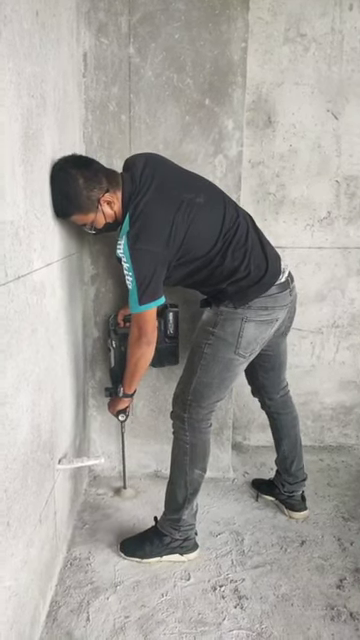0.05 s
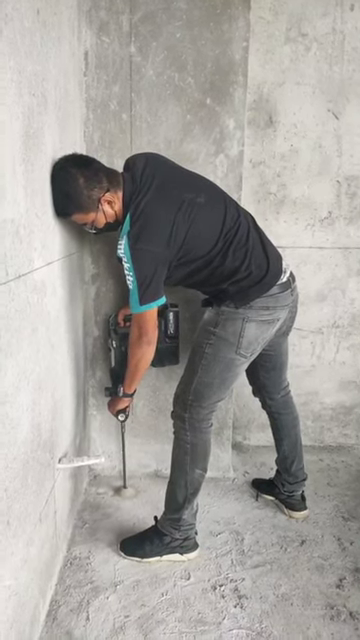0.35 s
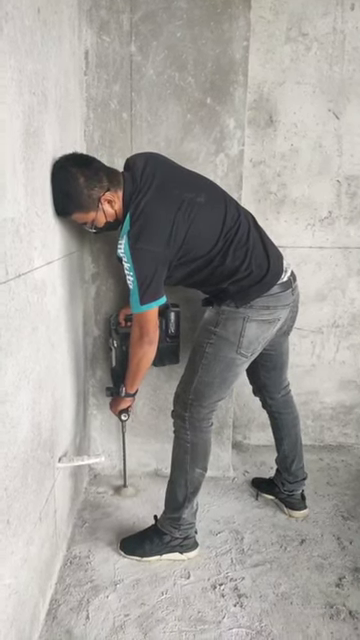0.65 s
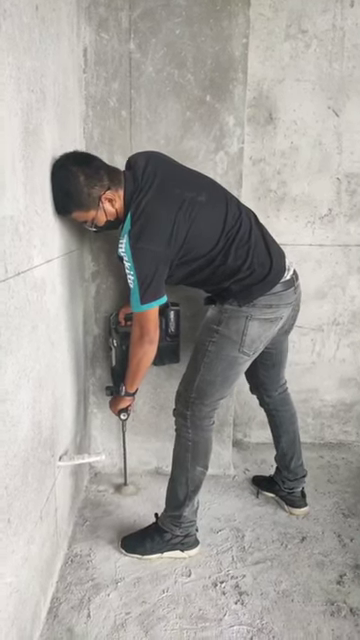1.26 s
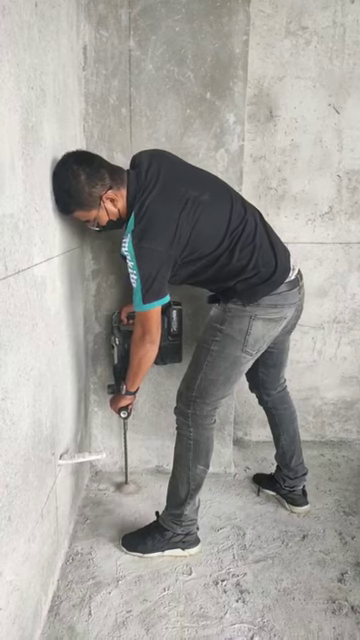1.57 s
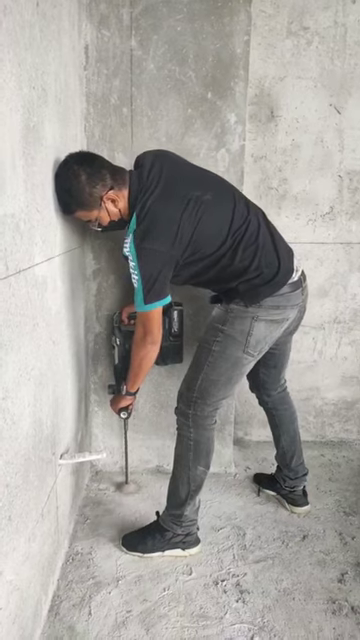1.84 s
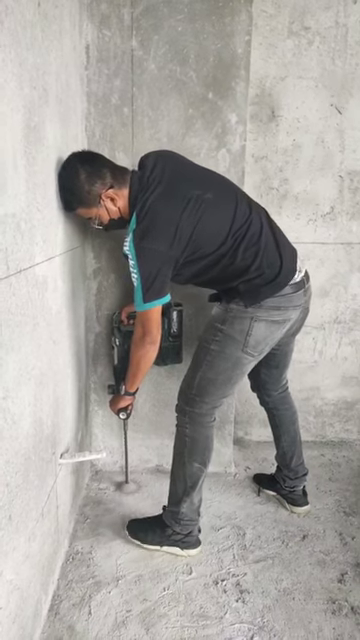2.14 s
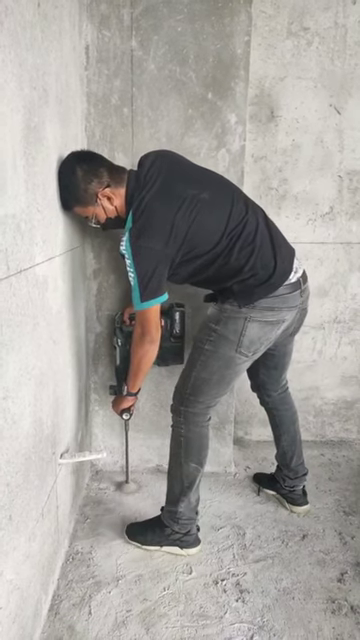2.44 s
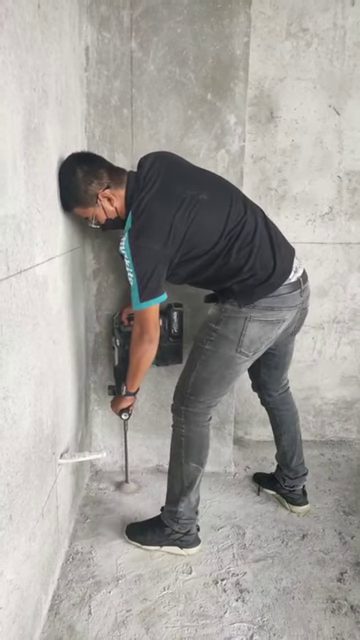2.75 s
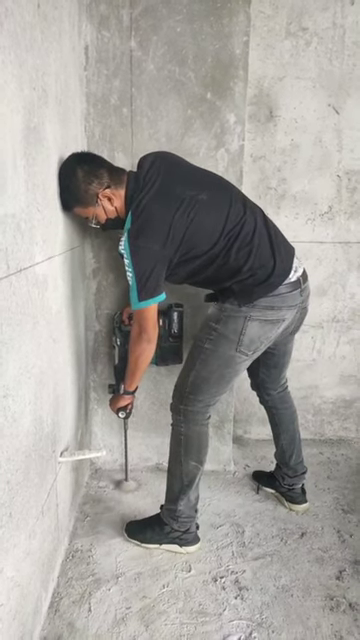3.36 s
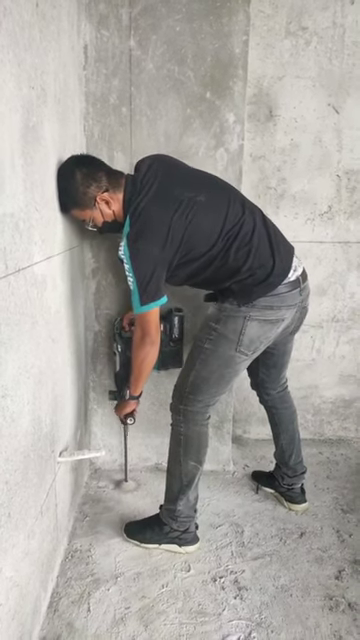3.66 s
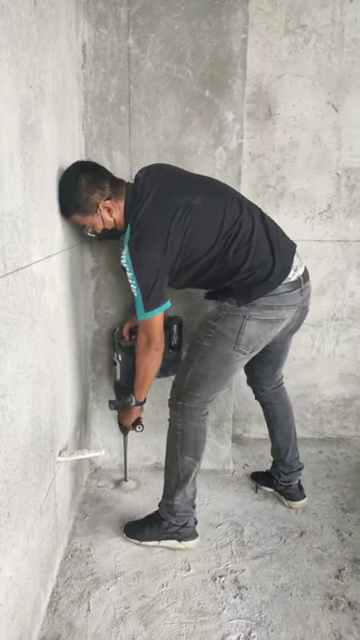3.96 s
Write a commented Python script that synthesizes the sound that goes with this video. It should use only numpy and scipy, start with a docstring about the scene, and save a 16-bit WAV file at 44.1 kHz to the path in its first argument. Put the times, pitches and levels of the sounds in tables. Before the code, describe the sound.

Close by in an echoing concrete room, a hammer drill rattles loudly and steadily, its steel bit ringing and grinding stone. The blows then weaken and stop, and the motor whines briefly on.

```python
"""Rotary hammer in a bare concrete room.

A cordless rotary hammer bores into the floor; one microphone, near enough to hear the mechanism.
48 times a second the piston knocks in the housing, the striker hits the ringing steel bit, which
crunches concrete, and clicks back. Near the end the pressure comes off: the bit comes loose, the blows
come late and die away, leaving the motor's whine and fan."""
import sys
import numpy as np
from scipy import signal
from scipy.fft import rfft, irfft, next_fast_len
from scipy.io import wavfile
from scipy.ndimage import uniform_filter1d

SR = 44100
rng = np.random.default_rng(int(sys.argv[2]) if len(sys.argv) > 2 else 0)


def wav_record(signal):
    """Record a signal, one row per channel, as 16-bit PCM in the file named by sys.argv[1]."""
    frames = np.transpose(np.atleast_2d(signal))
    bounded = np.clip(frames, -1, 1)
    # unit amplitude maps onto the largest positive 16-bit level
    quanta = np.round(bounded * 32767).astype(np.int16)
    wavfile.write(sys.argv[1], SR, quanta)


N = 176400
T = np.arange(N) / SR
BLOW_HZ, BLOWS_PER_TURN = 48.18, 6
CRUNCH_S, TOOL_WET_DB = 0.009, -0.5


def from_db(db):
    """Decibels to gain."""
    return 10 ** (np.asarray(db) / 20)


def unit_rms(x):
    """Scale to unit level."""
    return x / np.sqrt(np.mean(x ** 2) + 1e-20)


def curve(rows, t=T):
    """Read a two-column table at times t."""
    return np.interp(t, *np.transpose(rows))


def drift(rate_hz):
    """A random wander at unit level."""
    knots = rng.standard_normal(4000)
    return unit_rms(np.interp(T * rate_hz, np.arange(len(knots)), knots))


def colour(x, spectrum):
    """Minimum-phase filter through (freq_hz, level_db) points; unit level out."""
    size = next_fast_len(N + SR // 10)
    size += size % 2
    hz, db = np.transpose(spectrum)
    bin_hz = np.maximum(np.arange(size // 2 + 1) * SR / size, 1)
    cepstrum = irfft(np.log(from_db(np.interp(np.log(bin_hz), np.log(hz), db))))
    cepstrum[1:size // 2] *= 2
    cepstrum[size // 2 + 1:] = 0
    return unit_rms(irfft(rfft(x, size) * np.exp(rfft(cepstrum)))[:N])


def resonate(x, hz, width_hz):
    """One resonance with gain 1 at its peak."""
    radius = np.exp(-np.pi * width_hz / SR)
    feedback = [1, -2 * radius * np.cos(2 * np.pi * hz / SR), radius ** 2]
    return signal.lfilter(np.array([1, 0, -1]) * (1 - radius ** 2) / 2, feedback, x + 1e-18)


def clicks(times, db):
    """One click per contact."""
    train = np.zeros(N)
    inside = (times >= 0) & (times < (N - 1) / SR)
    train[(times[inside] * SR).astype(int)] = from_db(db)[inside]
    return train


def bursts(train, length_s, rise_s=0.0016):
    """Each click becomes a spray of tiny contacts that builds, holds briefly and dies."""
    t = T[:SR // 20]
    shape = (1 - np.exp(-t / rise_s)) ** 1.6 * np.exp(-(t / length_s) ** 2)
    power = signal.fftconvolve(train ** 2, shape / shape.sum())[:N]
    return np.sqrt(np.maximum(power, 0)) * rng.standard_normal(N)


def room(x, wet_db, t60_s=0.54, treble_t60_s=0.46, treble_hz=4900, onset_s=.003):
    """Direct sound at the microphone plus the dense echoes of bare concrete; the treble dies sooner."""
    t, noise = T[:SR], rng.standard_normal(SR)
    low = signal.sosfiltfilt(signal.butter(2, treble_hz, fs=SR, output="sos"), noise)
    tail = low * from_db(-60 * t / t60_s) + (noise - low) * from_db(-60 * t / treble_t60_s)
    tail *= t > onset_s
    echoes = signal.fftconvolve(x, tail / np.linalg.norm(tail))[:N]
    wet = from_db(wet_db)
    return (x + wet * echoes) / np.hypot(1, wet)


# Motor speed: time_s, rotor_hz
ROTOR_SPEED = [(0, 298.9), (3.79, 297.2), (3.85, 299.6), (3.92, 304), (4, 295)]
# Main whine at the microphone: time_s, level_db
WHINE_LEVEL = [(0, -52), (3.79, -50), (3.85, -42), (4, -46.5)]
# Weaker tones, relative to the main whine: rotor_multiple, level_db
WHINE_PARTIALS = [(6, -6), (16, -11), (24, -10)]
# Rush of fan and gears: freq_hz, density_db
FAN_SPECTRUM = [(40, -27), (600, 4), (1200, 2), (2400, -6), (4200, -4), (6300, -11), (7200, -7),
                (8200, -14), (15000, -30)]


def motor(flutter=0.0014, shimmer_db=1.5, whine_multiple=8, throb_hz=14.5, throb_from_s=3.81):
    """The motor whines over the fan; as its pitch shifts at the end, it throbs at the microphone."""
    phase = 2 * np.pi * np.cumsum(curve(ROTOR_SPEED) * (1 + flutter * drift(120))) / SR
    whine = from_db(shimmer_db / 2 * drift(40)) * np.sin(whine_multiple * phase)
    whine *= np.where(T > throb_from_s, abs(np.sin(np.pi * throb_hz * (T - throb_from_s))), 1)
    for multiple, db in WHINE_PARTIALS:
        whine += from_db(db + shimmer_db * drift(40)) * np.sin(multiple * phase)
    fan = from_db(-43.5) * colour(rng.standard_normal(N), FAN_SPECTRUM)
    return np.sqrt(2) * from_db(curve(WHINE_LEVEL)) * whine + fan


# Deep bass at the microphone: time_s, level_db
RUMBLE_LEVEL = [(1.4, -67), (1.65, -93), (3, -66), (3.9, -91)]


def rumble(lumpy_db=4):
    """A faint lumpy rumble, strongest near 50 Hz."""
    lumps = rng.standard_normal(N) * from_db(lumpy_db * drift(13))
    return from_db(curve(RUMBLE_LEVEL)) * colour(lumps, [(15, -18), (50, 16), (160, -21), (800, -53)])


# Lag of the hammer cycle behind its even beat: time_s, lag_s
CYCLE_LAG = [(0, 0.00036), (1.0, -0.0053), (2.4, -.0029), (3.55, -0.0023), (3.75, -.0013), (3.83, -0.00073)]
# Load on the piston: time_s, gain_db
PISTON_LOAD = [(0, -0.5), (1.45, -1.7), (2.8, -3.5), (3.35, -2), (3.56, -4), (3.63, -12), (3.8, -11),
               (3.9, -28)]
# Force of the blows: time_s, gain_db
BLOW_FORCE = [(0, 0), (1.0, -1), (2.1, -1), (3.15, -0.9), (3.45, -0.5), (3.76, -4), (3.83, -6), (3.87, -49)]
# Tones of the housing: blow_rate_multiple, gain_db
HOUSING_TONES = [(2, -24), (3, -25), (4, -17), (5, -18.5), (6, -18.5), (8, -15.5), (10, -15.5), (11, -12.5),
                 (12, -2), (13, -14), (14, -11.5), (15, -7), (16, -8.5), (17, -15), (18, -2.5), (19, -9.5),
                 (20, -11.5), (21, -5.5), (22, -6.5), (23, -6.5)]
# Loose rattle of the gear case: freq_hz, density_db
RATTLE_SPECTRUM = [(100, -13.5), (280, -12), (520, 1.5), (800, -4), (1100, 2.5), (1400, -5.5),
                   (2000, -15.5), (3000, -10), (8000, -16.5)]


def housing(times, lead_s=0.001537, gap_s=.007, waver=0.12, buzz_db=-33, rattle_db=-38):
    """Two piston knocks a cycle make the housing buzz and the gear case rattle."""
    cycle_phase = 2 * np.pi * BLOW_HZ * (T - curve(CYCLE_LAG) + lead_s)
    buzz = 0
    for multiple, db in HOUSING_TONES:
        gain = from_db(db) * (1 + waver * drift(9))
        pair_phase = np.angle(1 + np.exp(-2j * np.pi * multiple * BLOW_HZ * gap_s))
        scatter = rng.standard_normal() + waver * drift(9)
        buzz += gain * np.cos(multiple * cycle_phase + pair_phase + scatter)
    buzz = from_db(buzz_db + curve(PISTON_LOAD)) * unit_rms(buzz)
    knock_times = np.concatenate([times, times + gap_s]) - lead_s
    knocks = clicks(knock_times, curve(BLOW_FORCE, knock_times))
    rattle = colour(bursts(knocks, length_s=0.0027), RATTLE_SPECTRUM)
    return buzz + from_db(rattle_db) * room(rattle, TOOL_WET_DB)


def steel_contact(times, modes, level, jitter_s, wet_db, spread_db=.8):
    """Steel meets steel inside the tool, once a cycle, harder under load."""
    lateness, strength = rng.standard_normal((2, len(times)))
    hits = clicks(times + jitter_s * lateness, curve(PISTON_LOAD, times) + spread_db * strength)
    ring = sum((-1) ** k * from_db(db) * resonate(resonate(hits, hz, width_hz), hz, width_hz)
               for k, (hz, width_hz, db) in enumerate(modes))
    return room(unit_rms(ring) * from_db(curve(level)), wet_db)


# Resonances of the striker in its tube: pitch_hz, width_hz, gain_db
STRIKER_MODES = [(3097, 540, -3.5), (3830, 230, 1.5), (4128, 240, 5), (4987, 690, 2.5)]
# Its clack: time_s, level_db
STRIKER_LEVEL = [(0, -39.5), (1.3, -37), (2.1, -32.5), (2.601, -35.5), (3.15, -37), (3.45, -31), (3.6, -48)]


def striker(times):
    """The striker clacks in its tube; more echo than direct sound reaches the microphone."""
    return steel_contact(times, STRIKER_MODES, STRIKER_LEVEL, jitter_s=.00003, wet_db=4)


def stone_grain(count, memory=0.46):
    """A random value per blow that partly recurs each turn, as the cutter meets the same grain again."""
    feedback = np.r_[1, np.zeros(BLOWS_PER_TURN - 1), -memory]
    grain = signal.lfilter([1], feedback, rng.standard_normal(count))
    return np.clip(unit_rms(grain), -2, 1)


# Blows that stand out: start_s, force_db
HARD_BLOWS = [(0.081, 0.5), (0.433, 4.5), (0.557, 4), (0.911, 4), (1.117, 2.5), (1.615, 1), (1.739, 3.5),
              (1.99, 1), (2.114, 1.5), (2.218, 4), (2.342, 5), (2.405, 4), (2.466, 2), (2.799, -1.5),
              (2.903, 0.5), (3.069, 3), (3.277, 3), (3.298, 1), (3.485, 1.5), (3.63, 3)]
# Ring of the steel bit: pitch_hz, width_hz, gain_db
BIT_MODES = [(4030, 550, -9.5), (5005, 102, 0.5), (6347, 127, -4), (7822, 76, -8.5), (9410, 105, -12),
             (11240, 61, -15), (13070, 70, -13), (14980, 75, -22)]
# Its strongest mode weakens as the bit comes loose: time_s, gain_db
LOOSENING = [(3.55, 0), (3.78, -8)]
# Concrete crushed at the floor: freq_hz, density_db
CRUNCH_SPECTRUM = [(300, -10.5), (700, 4), (2400, -3.5), (3300, 14), (4400, 13.5), (7000, -13), (10500, -8),
                   (12300, -9), (15000, -12)]
# Long ring of the shank: pitch_hz, level_db
SHANK_MODES = [(4170, -43), (9245, -48.5), (14140, -48)]
# Taps on the shank, stronger once the bit sits loose: time_s, gain_db
SHANK_TAPS = [(1.8, -2.5), (3.1, -7), (3.5, -5), (3.8, 5), (3.87, -30)]


def bit(beats, blow_spread_db=2.67, mode_spread_db=4, ring_db=-29.5, crunch_db=-41):
    """Each blow makes the bit chatter, ring with a new mix of modes and crush stone; the shank sings."""
    times, count = beats.copy(), len(beats)
    force_db = curve(BLOW_FORCE, times) + blow_spread_db * stone_grain(count)
    for start_s, hard_db in HARD_BLOWS:
        nearest = np.argmin(abs(beats - start_s))
        times[nearest], force_db[nearest] = start_s, hard_db
    hits = clicks(times, np.zeros(count))
    blow_index = np.maximum(np.searchsorted(times, T) - 1, 0)
    ring = 0
    for hz, width_hz, mode_db in BIT_MODES:
        mode = resonate(bursts(hits, length_s=0.0023, rise_s=.003), hz, width_hz)
        is_strongest = hz == BIT_MODES[1][0]
        seat_db = is_strongest * curve(LOOSENING, times) + mode_spread_db * stone_grain(count)
        # The blow, not the chatter, sets the energy of the ring.
        energy = np.bincount(blow_index, mode ** 2, count)
        gain = from_db(force_db + mode_db + seat_db) / np.sqrt(energy + energy.mean() / 10)
        ring += mode * uniform_filter1d(gain[blow_index], size=32)
    crunch = colour(bursts(clicks(times, force_db), CRUNCH_S, rise_s=.002), CRUNCH_SPECTRUM)
    tap_db = curve(SHANK_TAPS, times) + mode_spread_db * stone_grain(count)
    taps = clicks(times, tap_db) * rng.choice([-1, 1], N)
    shank = sum(from_db(db) * unit_rms(resonate(taps, hz, width_hz=52)) for hz, db in SHANK_MODES)
    return room(from_db(ring_db) * unit_rms(ring) + from_db(crunch_db) * crunch + shank, wet_db=-6.5)


# Grinding in the hole, heard at the microphone: time_s, level_db
GRIND_LEVEL = [(0, -39), (1.5, -38), (1.8, -44.5), (3.3, -40.5)]


def grind(times, hz=1320, width_hz=1470):
    """The flutes grind dust against the wall of the hole after every blow."""
    spray = bursts(clicks(times, curve(BLOW_FORCE, times)), CRUNCH_S)
    band = resonate(resonate(spray, hz, width_hz), hz, width_hz)
    return from_db(curve(GRIND_LEVEL)) * unit_rms(room(band, TOOL_WET_DB))


# Resonances struck on the striker's return: pitch_hz, width_hz, gain_db
RETURN_MODES = [(5040, 340, -1.5), (14600, 2100, -4)]
# Its click: time_s, level_db
RETURN_LEVEL = [(0, -38.5), (1.7, -41), (3.2, -43.5), (3.5, -40)]


def striker_return(times, delay_s=.0145):
    """The striker clicks back after each blow."""
    return steel_contact(times + delay_s, RETURN_MODES, RETURN_LEVEL, jitter_s=.00005, wet_db=1)


# Dull bumps at the microphone: start_s, peak_db
BASS_BUMPS = [(.072, -40), (.448, -45), (1.115, -45), (1.402, -54), (1.47, -48), (2.755, -53), (2.959, -48)]


def bumps(pitch_hz=55.4, rise_s=0.0074):
    """Soft low bumps, each a couple of cycles long."""
    bass = np.zeros(N)
    for start_s, peak_db in BASS_BUMPS:
        age = np.maximum(T - start_s, 0)
        envelope = age / rise_s * np.exp(1 - age / rise_s)
        bass += from_db(peak_db) * envelope * np.sin(2 * np.pi * pitch_hz * age)
    return bass


def scene():
    """One hammer cycle times all the blows; motor and bass run underneath, in mono."""
    even_beats = np.arange(int(N / SR * BLOW_HZ) + 1) / BLOW_HZ
    times = even_beats + curve(CYCLE_LAG, even_beats)
    hammer = striker(times) + striker_return(times) + bit(times) + grind(times) + housing(times)
    return (hammer + motor() + rumble() + bumps())[None]


def record(dry, cutoff_hz=15650):
    """The top of the microphone's signal is cut steeply."""
    return signal.sosfilt(signal.ellip(12, .1, 90, cutoff_hz, fs=SR, output="sos"), dry)


dry = scene()
out = record(dry)
wav_record(out)
```